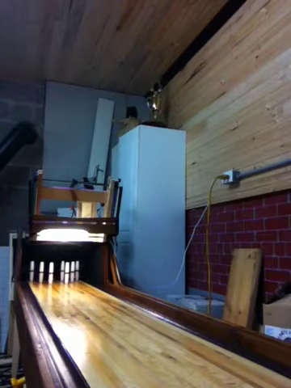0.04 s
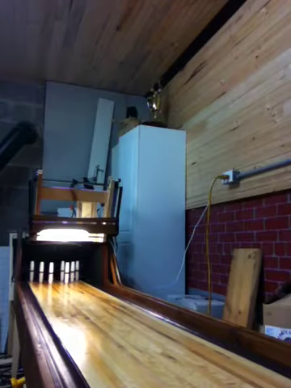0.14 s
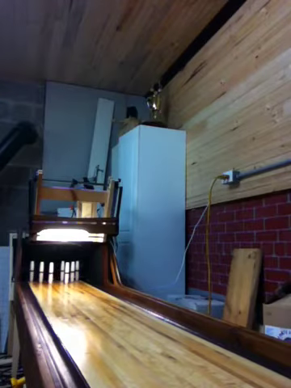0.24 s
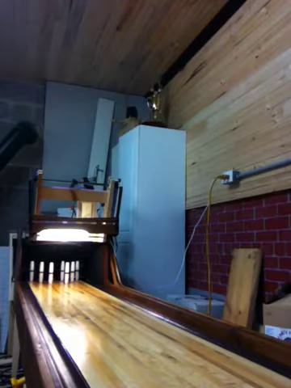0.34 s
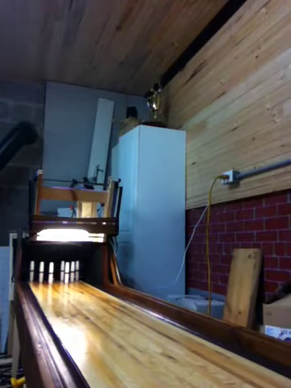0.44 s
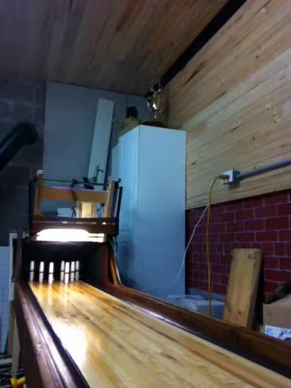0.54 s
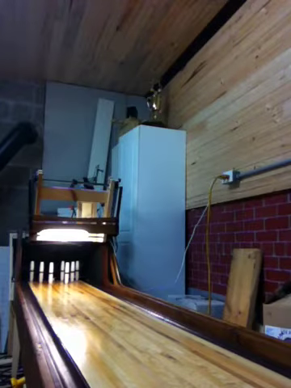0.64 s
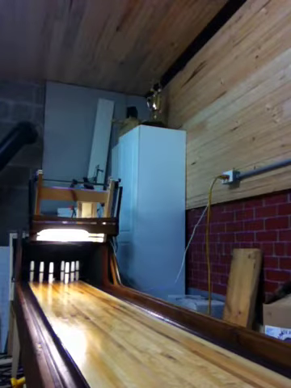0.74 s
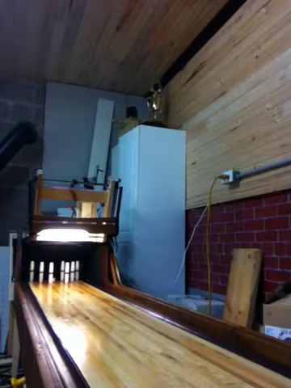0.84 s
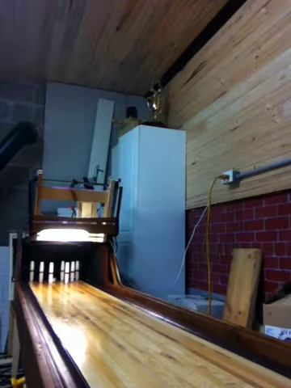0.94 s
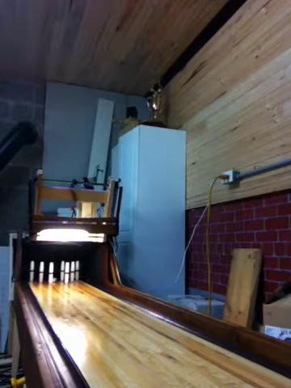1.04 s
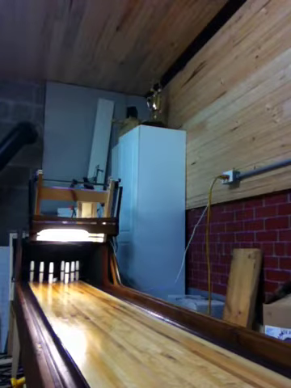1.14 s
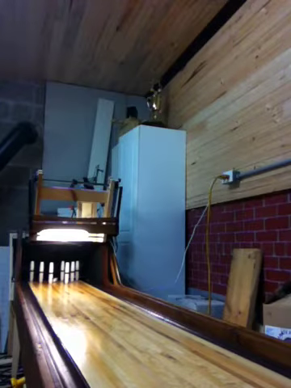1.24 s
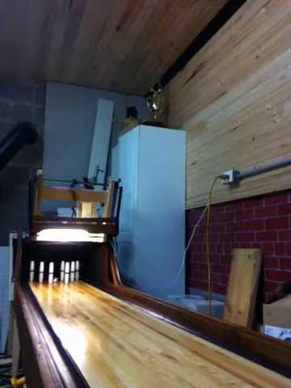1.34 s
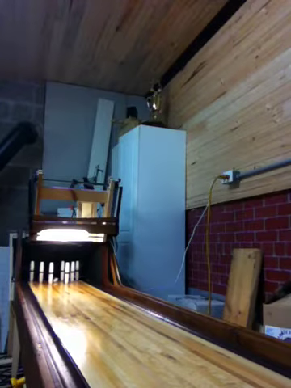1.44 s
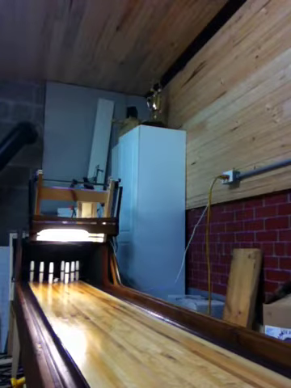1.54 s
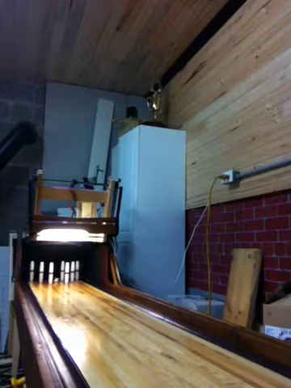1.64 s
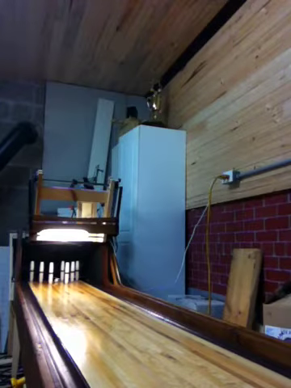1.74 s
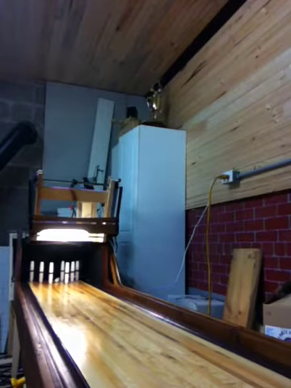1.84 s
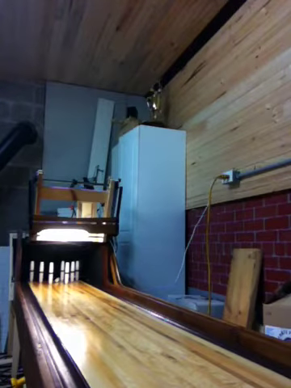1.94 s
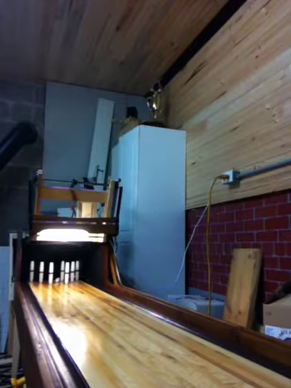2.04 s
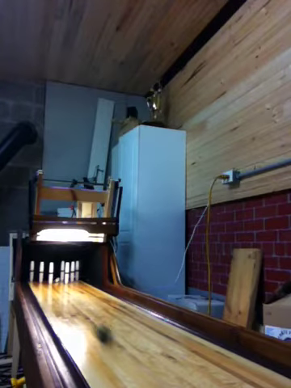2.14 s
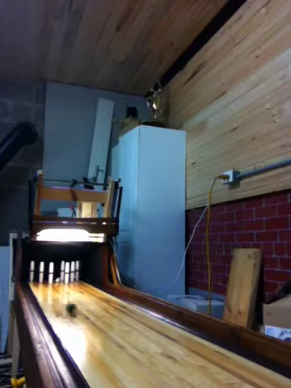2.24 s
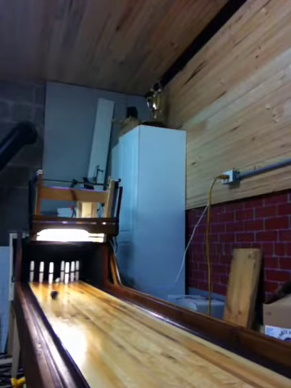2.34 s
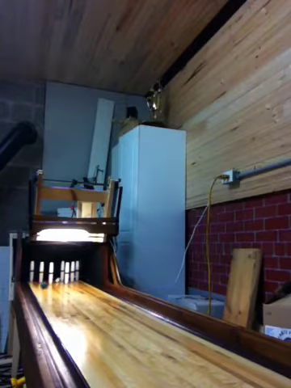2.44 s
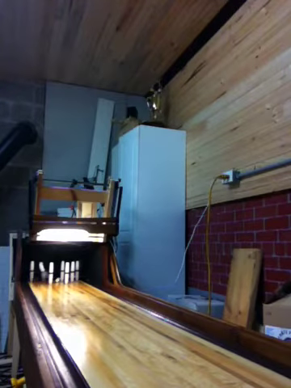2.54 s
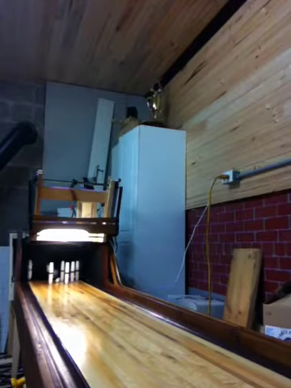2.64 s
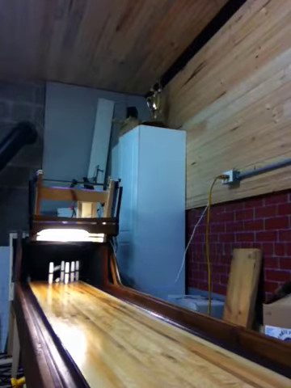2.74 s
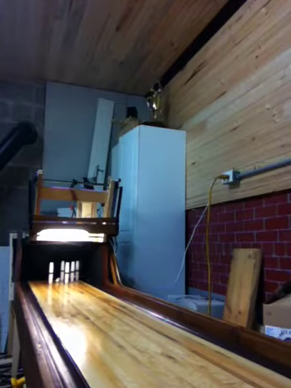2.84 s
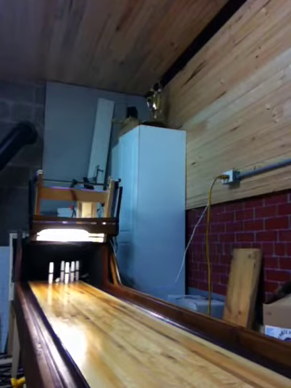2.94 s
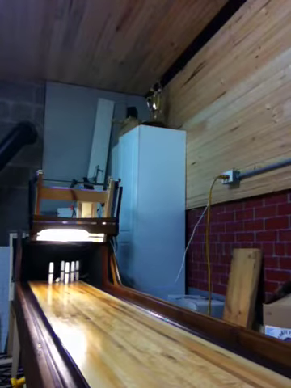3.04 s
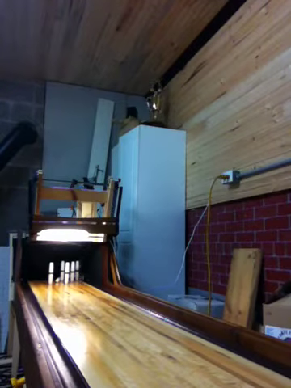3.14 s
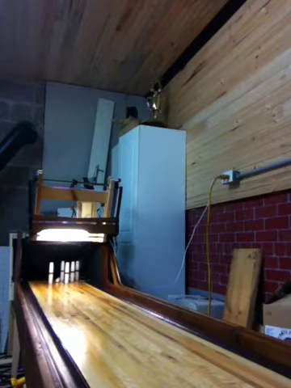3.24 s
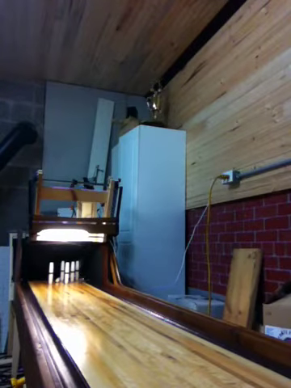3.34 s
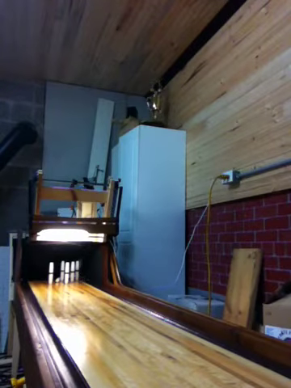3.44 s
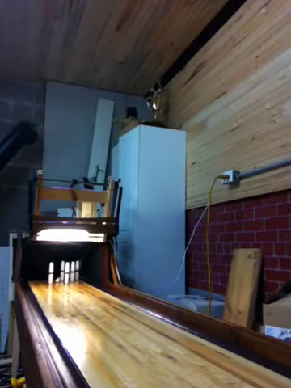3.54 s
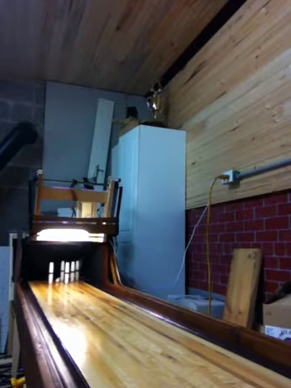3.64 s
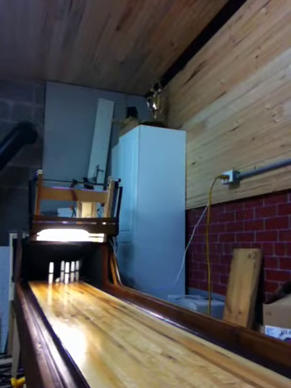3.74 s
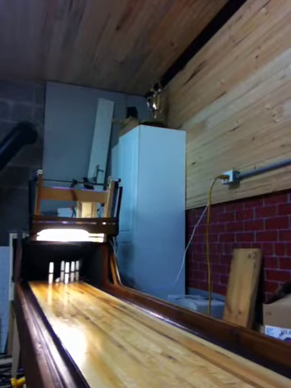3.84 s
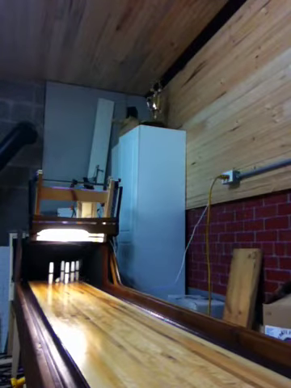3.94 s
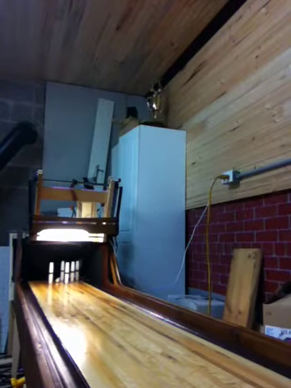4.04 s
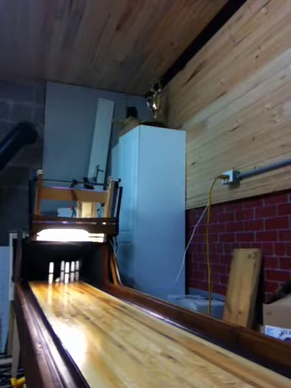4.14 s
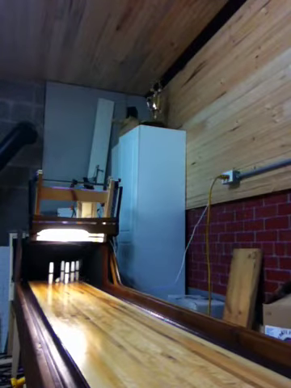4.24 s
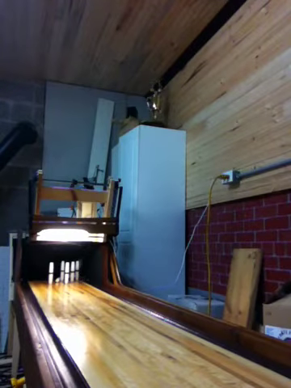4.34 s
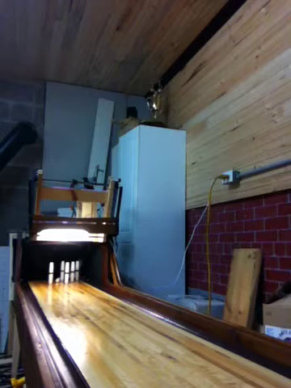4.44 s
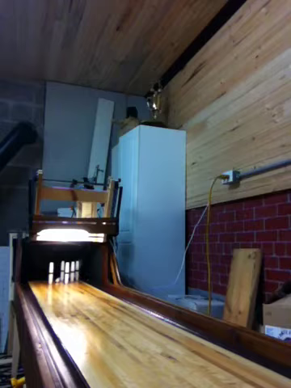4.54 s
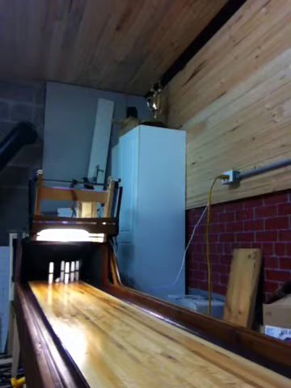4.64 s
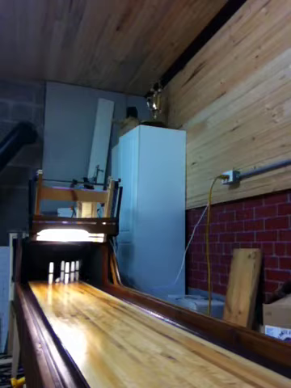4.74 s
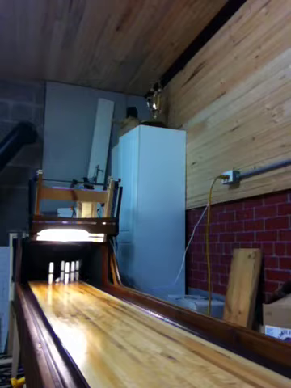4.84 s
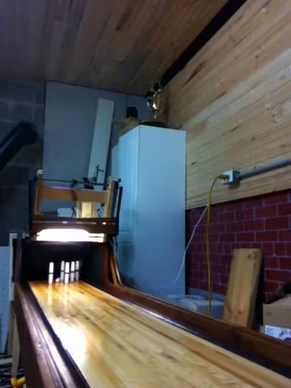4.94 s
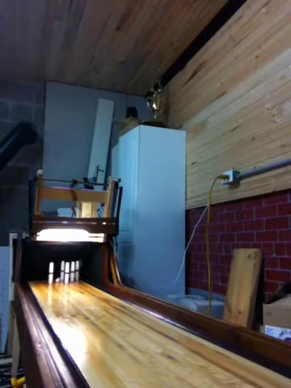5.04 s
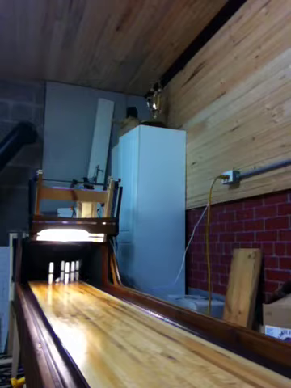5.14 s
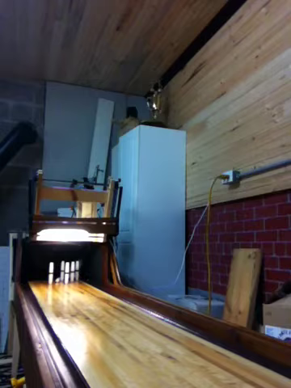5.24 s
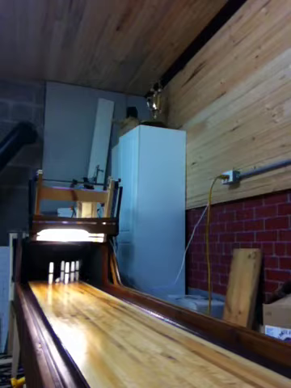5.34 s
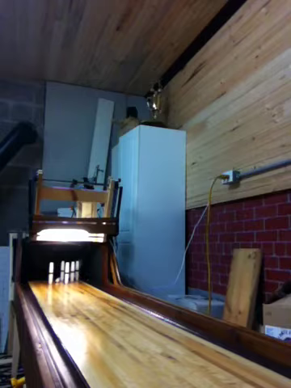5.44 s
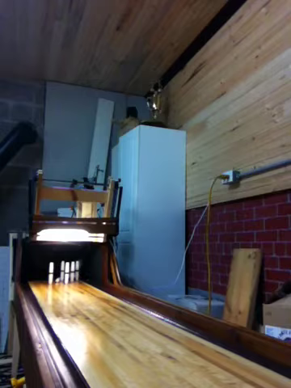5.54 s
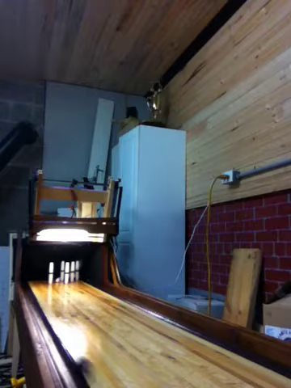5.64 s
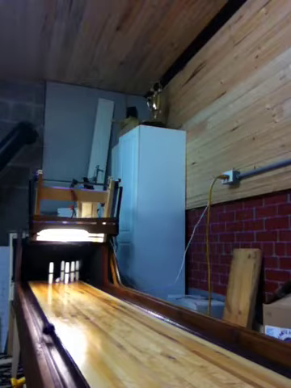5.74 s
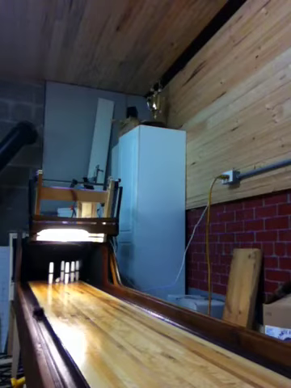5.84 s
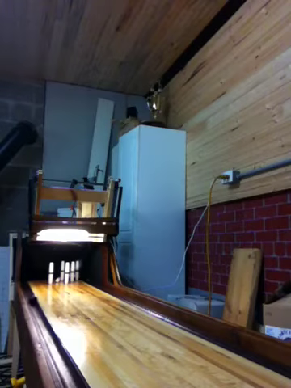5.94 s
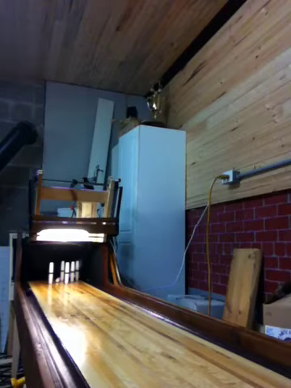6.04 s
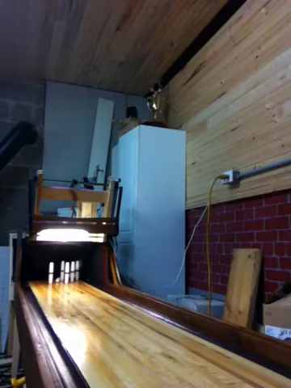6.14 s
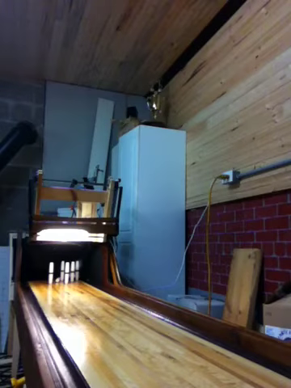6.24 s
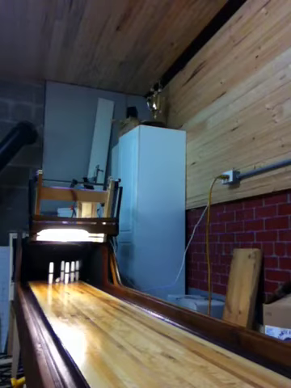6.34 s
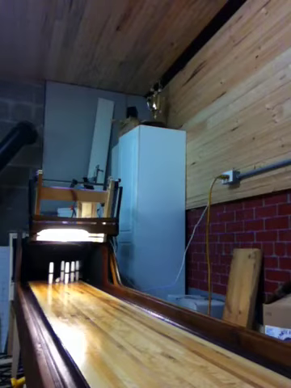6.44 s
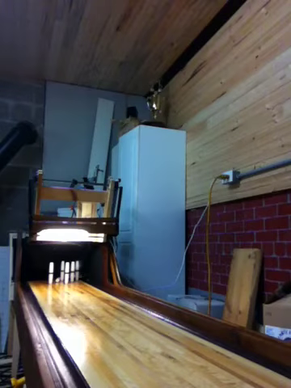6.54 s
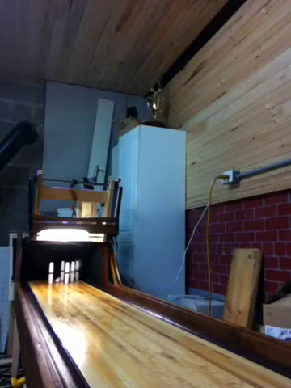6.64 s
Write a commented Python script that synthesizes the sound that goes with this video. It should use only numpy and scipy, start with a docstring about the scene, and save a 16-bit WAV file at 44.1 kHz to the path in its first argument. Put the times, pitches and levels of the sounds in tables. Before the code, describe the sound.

In a small indoor room with faint rumble and hiss, a wooden bowling machine clacks softly. A small ball drops on the boards, hops faster and softer, rolls, cracks into pins and tumbles with hollow knocks in the pit. After more clacks, a second ball bounces, rolls, knocks and scuffs along the gutter, then slams into the back. Mono, close to the lane, short room echo.

```python
"""The ball return of a home-built wooden lane clacks over a droning trough and steady room rumble and hiss.
A first small ball drops on the boards, hops ever lower and faster, rolls, scatters pins and tumbles in the pit.
The machine clacks again; a second ball drops, hops, rolls, scuffs along the gutter and slams into the back.
Hits are cracks, filtered noise shudders, decaying modes and room tails; rolling and drones are shaped noise."""
import sys
import numpy as np
from scipy import signal
from scipy.fft import rfft, irfft
from scipy.io import wavfile
from scipy.ndimage import uniform_filter1d

SR = 44100
rng = np.random.default_rng(int(sys.argv[2]) if len(sys.argv) > 2 else 0)


def store_pcm(level_fs):
    """Save levels as 16-bit WAV."""
    pcm = np.round(np.clip(level_fs, -1, 1) * 32767).astype(np.int16)
    wavfile.write(sys.argv[1], SR, np.atleast_2d(pcm).T)


N = 295029

# In the hit tables, thud and click are relative to the wood, ahead of the trims in blows().
# Balls dropped on the lane. Each row: start in seconds, first hop in seconds, bounciness 0-1,
# bounciness lost per second of hop.
THROWS = [(1.6935, .099, .885, 2.45), (5.2135, .1168, .84, 1.85)]
# First landing of each throw. Each row: wood in dB, crack pitch in Hz, thud in dB, click in dB.
LANDINGS = [(-11, 1088, -12, -14), (-11, 1110, -12, -11)]
# Change of a landing each time the hop halves
HALF_WOOD_DB, HALF_THUD_DB, HALF_CLICK_DB, HALF_OCTAVES = -6.5, 2, -3, -0.2
# Rolling ball jolting over uneven boards. Each row: start in seconds, wood in dB, crack pitch in Hz.
JOLTS = [(2.081, -23, 930), (2.1, -28.5, 860), (2.16, -31.5, 1050), (2.295, -28.5, 1010),
         (2.314, -27, 1350), (2.515, -22, 1340), (2.545, -24.5, 890), (2.569, -21.5, 832),
         (5.623, -20.5, 1480), (5.646, -24, 920), (5.674, -25, 1330), (5.708, -23.5, 960)]
JOLT_THUD_DB, JOLT_CLICK_DB = -15, -17.5
# Colour of the lane boards. Each row: frequency in Hz, relative level in dB per Hz.
LANE_COLOUR = [(35, -69), (74, -24), (99, -2), (123, -16.5), (166, -11), (295, -3), (332, -7), (539, 0.5),
               (619, -5.5), (1050, 1), (1420, -2), (2110, -11.5), (2980, -23), (6380, -39), (9500, -52),
               (12000, -67.5), (15000, -71)]
# Modes of the lane. Each row: frequency in Hz, relative level in dB, t60 in seconds.
LANE_MODES = [(101, -20.5, 0.44), (155.7, -16, 0.53), (189.7, -20, 0.19), (475, -14, 0.099),
              (1077, -17.5, 0.21)]

# Level curves of the runs, two on the lane and one in the gutter. Each row: time in seconds, level in dB
# ahead of the trims.
ROLL_RUNS = [
    [(2.03, -32.5), (2.474, -27), (2.568, -28), (2.61, -29.5)],
    [(5.54, -29), (5.608, -31.5), (5.65, -21), (5.76, -40.5)],
    [(5.99, -36), (6.006, -34), (6.346, -35), (6.39, -47)],
]
# Balance of each run. Each row: rumble in dB and hiss in dB, re the middle band, ahead of the trims.
ROLL_TINTS = [(-6, -17), (-15, -30), (-2, -8)]
# Colour of the rolling. Each row: frequency in Hz, relative level in dB per Hz.
ROLL_COLOUR = [(35, -67), (60, -45), (141, -11), (276, -10), (332, -12), (469, -10), (619, -3.5), (798, 5),
               (1300, -1.5), (1390, -3.5), (1600, -7.5), (2530, -13.5), (7500, -32.5), (15000, -60.5)]

# Ball clipping a pin. Each row: start in seconds, wood in dB, crack pitch in Hz, thud in dB, click in dB.
STRIKES = [(2.6195, -23.5, 3560, -25, 1), (2.6525, -26, 5970, -7, 1), (6.3955, -39.5, 5940, -14, 5)]
# Colour of a clipped pin. Each row: frequency in Hz, relative level in dB per Hz.
STRIKE_COLOUR = [(80, -45), (400, -16), (900, -5.5), (1600, 17.5), (2600, 6.5), (4000, 6.5), (6000, 2),
                 (7000, 0.5), (7700, -20.5), (10000, -14.5), (12000, -43), (16000, -42.5)]
# Pins tumbling on deck and side boards. Each row: start in seconds, wood in dB, crack pitch in Hz, click in dB.
PINS = [(2.835, -17.5, 2190, -7.5), (2.86, -19, 3060, -2.5), (2.867, -23, 3040, 2), (2.896, -35, 2490, -9),
        (2.946, -24.5, 2340, -8), (2.979, -21.5, 2550, -5.5), (2.994, -20.5, 2510, -18),
        (3.026, -22.5, 1980, -12.5), (3.354, -29, 2350, -15), (3.363, -35.5, 4010, -29)]
PIN_THUD_DB = -8
# Colour of tumbling pins. Each row: frequency in Hz, relative level in dB per Hz.
PIN_COLOUR = [(60, -31.5), (110, -18.5), (500, -2.5), (1000, -8.5), (1500, -3.5), (2300, -7), (3200, -0.5),
              (5600, 2), (7500, -7), (10000, -17.5), (12500, -32.5), (16000, -57)]
# Modes of the pins. Each row: frequency in Hz, relative level in dB, t60 in seconds.
PIN_MODES = [(584, -8.5, .25), (690, -8.5, .25), (944, -3, .26), (1405, -11, .35), (1850, -11, .45),
             (2306, -12, .35), (2923, -13.5, .28), (2992, -13.5, .3), (3218, -12.5, .3), (3774, -16.5, .35),
             (4010, -9.5, .11), (4134, -17, .35), (4806, -13, .3), (5228, -14.5, .35), (5912, -17.5, .35),
             (6670, -19.5, .4)]

# Ball against gutter and pit walls. Each row: start in seconds, wood in dB, crack pitch in Hz, click in dB,
# rebound in dB re the first hit.
KNOCKS = [(2.705, -29.5, 1030, -28, -10.5), (2.766, -20.5, 947, -13.5, 4.5), (2.842, -20, 920, -14, -12),
          (2.996, -20.5, 517, -21, -5.5), (3.079, -19.5, 1090, -32, -1), (3.197, -21, 840, -14, 3.5),
          (3.256, -24, 560, -18, -6), (3.285, -26, 363, -8, -2.5), (3.386, -31.5, 893, -14, 4),
          (3.501, -31.5, 695, -20, -3), (3.544, -29, 788, -17, -4.5), (5.775, -20.5, 775, -12.5, 0),
          (5.853, -24.5, 840, -15.5, 1), (5.912, -23, 815, -20.5, 4), (5.956, -27.5, 890, -17, -7),
          (6.156, -32.5, 800, -39, -8), (6.4535, -19, 377, -5.5, -6), (6.515, -25.5, 328, -12.5, -9),
          (6.547, -25, 317, -28, -12)]
KNOCK_THUD_DB, THUD_DB_PER_OCTAVE = -13.5, -2.5  # thud re wood for a crack at 1 kHz, and its slope
KNOCK_REBOUND_S = 0.0072
# Colour of gutter and pit walls. Each row: frequency in Hz, relative level in dB per Hz.
PIT_COLOUR = [(41, -55.5), (70, -26), (215, -6), (330, -2), (403, -4.5), (540, 1.5), (618, -9), (809, -4),
              (1160, -7), (1330, -9.5), (1480, -9.5), (2910, -16), (8000, -29.5), (10500, -40),
              (12500, -51.5), (15000, -62)]
# Modes of gutter and pit walls. Each row: frequency in Hz, relative level in dB, t60 in seconds.
PIT_MODES = [(290, -19.5, .35), (341, -18.5, 0.52), (458, -19, 0.28), (546, -21.5, 1), (751, -28.5, 0.2),
             (825, -13, 0.21), (1312, -16, 0.17)]

SCUFF_FROM_S, SCUFF_TO_S, SCUFF_DB, SCUFF_FLUTTER_DB = 5.79, 6.3, -50.5, 3.5
# Colour of the gutter scuff. Each row: frequency in Hz, relative level in dB per Hz.
SCUFF_COLOUR = [(1000, -29), (3500, 4.5), (7500, 0), (10500, -9), (13000, -21), (16000, -36)]

# Clacks of pinsetter and ball return. Each row: start in seconds, wood in dB, crack pitch in Hz, thud in dB,
# click in dB, rebound in dB re the first hit.
CLACKS = [(0.044, -29.5, 748, -15.5, -12, -0.5), (0.428, -35, 1326, -1, -13, -10.5),
          (0.643, -34, 1668, -6, -10.5, -16), (0.898, -53.5, 375, 15, -5, -11),
          (4.068, -48, 1224, -1, -30, -1), (4.152, -32.5, 1390, -5.5, -8, -6.5),
          (4.384, -37, 580, -6, -12, 5)]
CLACK_REBOUND_S = .01
# Colour of the machine. Each row: frequency in Hz, relative level in dB per Hz.
SETTER_COLOUR = [(50, -43), (90, -4), (140, 15.5), (300, 17.5), (560, 24), (950, 14.5), (1400, 17),
                 (2100, 6), (3000, -3.5), (5000, -16.5), (12000, -43)]
# Modes of the machine. Each row: frequency in Hz, relative level in dB, t60 in seconds.
SETTER_MODES = [(540, -6, 0.37), (970, 9.5, 0.4), (1325, -22, 0.41), (1709, -11, 0.31), (1770, -1, 0.24),
                (1825, -2, 0.18), (2780, -3, 0.13)]
# Each clack's thud also shakes the trough
KICK_DB, KICK_RISE_DB_PER_S, KICK_FALL_DB_PER_S, KICK_LAG_S = 0.5, 598, 170, 0.005

# Resonances of the hollow trough. Each row: frequency in Hz, half width in Hz, relative level in dB.
TROUGH = [(141, 16, -12.5), (350, 12, 6.5), (302, 51, -9.5), (417, 40, -6), (546, 10, -4.5),
          (700, 260, -8.5), (1368, 56, -32.5)]
# Resonances of the gutter. Each row: frequency in Hz, half width in Hz, relative level in dB.
GUTTER = [(750, 27.5, 2), (756, 18, 1), (802, 13, 5), (1400, 51, -7)]
# Resonances of the end boards. Each row: frequency in Hz, half width in Hz, relative level in dB.
END_BOARDS = [(330, 20, 14), (1296, 89, 12.5), (1660, 82, 6)]
# Trough swells. Each row: peak time in seconds, level in dB ahead of the trim, rise and fall in dB per second.
TROUGH_SWELLS = [(0.01, -32.5, 292, 45), (0.42, -43, 71, 28), (3.29, -23.5, 313, 38), (3.53, -29, 300, 139),
                 (4.17, -42, 50.5, 52), (6.334, -38, 72, 123), (6.458, -16.5, 402, 97)]
# Gutter swells. Each row: peak time in seconds, level in dB ahead of the trim, rise and fall in dB per second.
GUTTER_SWELLS = [(5.923, -21.5, 905, 157), (6.16, -29.5, 60, 92)]
# End board swells. Each row: peak time in seconds, level in dB ahead of the trim, rise and fall in dB per second.
END_SWELLS = [(6.34, -32, 111, 300), (6.5, -23.5, 300, 89)]

AIR_DB = -57
# Colour of the room air. Each row: frequency in Hz, relative level in dB per Hz.
AIR_COLOUR = [(20, -2.5), (50, 2.5), (80, 6.5), (110, 1), (160, 0.5), (240, -1.5), (350, -8.5), (600, -13),
              (1100, -17.5), (2500, -19), (6000, -20.5), (11000, -23), (16000, -32.5)]
# Decay of the room tail. One t60 in seconds each for thud, wood and click.
ROOM_T60_S = [0.34, 0.48, 0.49]
LOW_HZ, HIGH_HZ = 500, 2500  # band splits
CEILING, EDGE_HZ = .76, 16000


def bounces(count=8):
    """A dropped ball loses speed at each landing, so its hops get shorter, softer and duller."""
    rows = []
    for (s, first_hop_s, bounciness, loss), (wood_db, hz, thud_db, click_db) in zip(THROWS, LANDINGS):
        hop_s = first_hop_s
        for _ in range(count):
            halvings = np.log2(first_hop_s / hop_s)
            rows.append((s, wood_db + HALF_WOOD_DB * halvings, hz * 2 ** (HALF_OCTAVES * halvings),
                         thud_db + HALF_THUD_DB * halvings, click_db + HALF_CLICK_DB * halvings))
            s += hop_s
            hop_s *= bounciness - loss * hop_s
    return rows


def lane():
    """Landings and jolts of the balls excite the boards and their modes."""
    jolts = [(s, db, hz, JOLT_THUD_DB, JOLT_CLICK_DB) for s, db, hz in JOLTS]
    return blows(bounces() + jolts, LANE_COLOUR, LANE_MODES, crack_db=-8.0, cycles=1.8,
                 body_db=[-1, -4, 0], body_s=.0055, room_db=[-8, -9, -9],
                 modes_db=5.5, focus_db=9.5, echo_share=0.59)


def rolling(bumps_per_s=320, spread_db=3, smooth=0.28, lumpy_db=1.5, trim_db=(-3, -2, -3)):
    """The ball rides over the grain of the boards: many tiny bumps on an uneven rub."""
    out = np.zeros(N)
    struck = rng.random(N) < bumps_per_s / SR
    heights = gain_of(spread_db * np.minimum(rng.exponential(1, N), 3))
    bumps = struck * heights * rng.choice([-1., 1.], N)
    rub = smooth * rng.standard_normal(N)
    drive = (bumps + rub) * gain_of(lumpy_db * lumps(size=600))
    runs = [follow(*np.transpose(rows)) for rows in ROLL_RUNS]
    for band in range(3):
        level = sum(run * gain_of((rumble_db, 0, hiss_db)[band])
                    for run, (rumble_db, hiss_db) in zip(runs, ROLL_TINTS))
        texture = evened(signal.oaconvolve(drive, colour(ROLL_COLOUR, band))[:N])
        out += gain_of(trim_db[band]) * level * texture
    return out


def strikes():
    """The ball clips pins: a short, high crack and the pin modes."""
    return blows(STRIKES, STRIKE_COLOUR, PIN_MODES, crack_db=-13.5, cycles=1.5,
                 body_db=[-1, -1, -1], body_s=0.0041, room_db=[-14, -15, -15],
                 modes_db=1.5, focus_db=12.5, echo_share=0.76)


def pins():
    """Tumbling pins ring their modes against deck and side boards."""
    tumbles = [(s, db, hz, PIN_THUD_DB, click_db) for s, db, hz, click_db in PINS]
    return blows(tumbles, PIN_COLOUR, PIN_MODES, crack_db=-18, cycles=2.2,
                 body_db=[-1, -1, -1], body_s=0.0084, room_db=[-8, -8, -8],
                 modes_db=6.0, focus_db=8, echo_share=0.67)


def knocks():
    """Double knocks of the ball on hollow boards; the deeper the crack, the more thud."""
    rows = []
    for s, db, hz, click_db, rebound_db in KNOCKS:
        thud_db = KNOCK_THUD_DB + THUD_DB_PER_OCTAVE * np.log2(hz / 1000)
        rows.append((s, db, hz, thud_db, click_db, rebound_db))
    return rebounding(rows, KNOCK_REBOUND_S)


def pit():
    """Knocks excite the hollow gutter and pit walls and their modes."""
    return blows(knocks(), PIT_COLOUR, PIT_MODES, crack_db=-5.5, cycles=2.04,
                 body_db=[-1, -3, 0], body_s=0.01, room_db=[-8, -9, -9],
                 modes_db=1.0, focus_db=8.0, echo_share=0.81)


def scuff():
    """Bright fluttering hiss of the ball rubbing the side of the gutter."""
    rub = evened(signal.oaconvolve(rng.standard_normal(N), colour(SCUFF_COLOUR))[:N])
    flutter = gain_of(SCUFF_FLUTTER_DB * lumps(size=400))
    return rub * flutter * follow([SCUFF_FROM_S, SCUFF_TO_S], [SCUFF_DB, SCUFF_DB])


def setter():
    """Double clacks of pinsetter and ball return: longer cracks and strongly focused modes."""
    return blows(rebounding(CLACKS, CLACK_REBOUND_S), SETTER_COLOUR, SETTER_MODES, crack_db=-8.5, cycles=11.0,
                 body_db=[-1, -1, 0], body_s=0.016, room_db=[-7, -7, -7],
                 modes_db=11.0, focus_db=29.5, echo_share=0.83)


def channels():
    """Trough, gutter and end boards hum on their resonances; clack thuds also shake the trough."""
    kicks = [(s + KICK_LAG_S, db + thud_db + KICK_DB, KICK_RISE_DB_PER_S, KICK_FALL_DB_PER_S)
             for s, db, _, thud_db, _, _ in CLACKS]
    trough = drone(TROUGH, TROUGH_SWELLS + kicks, trim_db=-4.0)
    gutter = drone(GUTTER, GUTTER_SWELLS, trim_db=-1)
    end_boards = drone(END_BOARDS, END_SWELLS, trim_db=-2.5)
    return trough + gutter + end_boards


def air():
    """Low steady rumble and hiss of the room, from coloured noise."""
    return gain_of(AIR_DB) * evened(signal.oaconvolve(rng.standard_normal(N), colour(AIR_COLOUR))[:N])


def blows(rows, spectrum, modes, crack_db, cycles, body_db, body_s, room_db, modes_db, focus_db, echo_share):
    """Each blow: a crack of a few cycles, a short shudder of the wood, its modes, and the room's tail.
    echo_share of the tail is the shudder thrown back, with its own uneven colour; the rest is a plain wash."""
    out, t = np.zeros(N), np.arange(SR * 3 // 4) / SR
    early = t < .03
    filters = [colour(spectrum, band) for band in range(3)]
    share = np.clip(echo_share, 0, 1)
    for s, wood_db, hz, thud_db, click_db in rows:
        u = 1.88 * t * hz / cycles
        # gradient: a small surface radiates no bass
        crack = np.gradient(u ** 2 * np.exp(-u) * np.sin(2 * np.pi * hz * t))
        sound = gain_of(crack_db) * crack / crack[early].std()
        levels_db = (thud_db, 0, click_db)
        for taps, level_db, trim_db, tail_db, t60 in zip(filters, levels_db, body_db, room_db, ROOM_T60_S):
            grain, walls, wash = rng.choice([-1., 1.], (3, len(t)))
            shudder = grain * np.exp(-t / body_s)
            fade = gain_of(tail_db - 60 * t / t60)
            kernel = shudder[early] / np.linalg.norm(shudder)
            echo = signal.fftconvolve(walls * fade, kernel)[:len(t)]
            tail = np.sqrt(share) * echo + np.sqrt(1 - share) * wash * fade
            part = signal.fftconvolve(shudder + tail, taps)[:len(t)]
            sound += gain_of(level_db + trim_db) * part / part[early].std()
        for (mode_hz, mode_db, t60), (a, b) in zip(modes, rng.standard_normal((len(modes), 2))):
            # modes near the crack pitch are favoured; each blow lands on another spot
            octaves_off = abs(np.log2(mode_hz / hz))
            ring_db = modes_db + mode_db + a - focus_db * min(2 * octaves_off, 1)
            swell = 1 - np.exp(-t * mode_hz / 2)
            tone = np.sin(2 * np.pi * mode_hz * (1 + 0.0035 * b) * t)
            sound += gain_of(ring_db - 60 * t / t60) * swell * tone
        add(out, s, gain_of(wood_db) * sound)
    return out


def rebounding(rows, gap_s):
    """Each hit is followed at once by a second one of the same colour."""
    hits = []
    for s, db, hz, thud_db, click_db, rebound_db in rows:
        hits.append((s, db, hz, thud_db, click_db))
        hits.append((s + gap_s, db + rebound_db, hz, thud_db, click_db))
    return hits


def drone(resonances, swells, trim_db):
    """A rolling ball or a shake keeps a hollow body sounding: noise through its resonances, levelled."""
    hz = np.fft.rfftfreq(N, 1 / SR)
    body = sum(gain_of(db) / (1 + ((hz - f) / width) ** 2) for f, width, db in resonances)
    hum = evened(irfft(body * rfft(rng.standard_normal(N)), N))
    hum /= np.sqrt(uniform_filter1d(hum ** 2, size=3000) + .01)  # a running level evens out the hum
    return gain_of(trim_db) * hum * swelling(swells)


def swelling(swells):
    """Gain of overlapping swells that each rise and fall at a steady dB rate, summed in power."""
    t = np.arange(N) / SR
    power = 0
    for s, db, rise, fall in swells:
        drop_db = np.maximum((s - t) * rise, (t - s) * fall).clip(max=200)
        power = power + gain_of(db - drop_db) ** 2
    return np.sqrt(power)


def follow(times, db):
    """Gain over the whole scene along a level curve, faded to silence outside it."""
    t = np.arange(N) / SR
    gate = np.interp(t, [times[0] - .02, times[0], times[-1], times[-1] + 0.19], [0, 1, 1, 0])
    return gain_of(np.interp(t, times, db)) * gate


def lumps(size):
    """Slow random unevenness of rms 1, with features about size samples long."""
    return evened(uniform_filter1d(uniform_filter1d(rng.standard_normal(N), size), size))


def colour(points, band=None, size=4096):
    """Causal minimum-phase filter with the given spectrum; band 0, 1 or 2 keeps its bass, middle or treble."""
    hz = abs(np.fft.fftfreq(size, 1 / SR)) + 1
    f, db = np.transpose(points)
    gain = gain_of(np.interp(np.log(hz), np.log(f), db))
    if band is not None:
        low = 1 / (1 + (hz / LOW_HZ) ** 8)
        high = 1 / (1 + (HIGH_HZ / hz) ** 8)
        gain = gain * np.sqrt([low, (1 - low) * (1 - high), high][band])
    log_gain = np.log(np.maximum(gain / gain.max(), 1e-5))
    return np.fft.ifft(np.exp(np.conj(signal.hilbert(log_gain)))).real[:size // 2]


def gain_of(db):
    """Decibels to amplitude."""
    return 10 ** (np.asarray(db) / 20)


def evened(x):
    """Scales to rms 1."""
    return x / np.sqrt(np.mean(x ** 2) + 1e-20)


def add(mix, s, sound):
    """Mixes a sound in at time s."""
    part = mix[max(round(s * SR), 0):][:len(sound)]
    part += sound[:len(part)]


def scene():
    """Sum of balls, pins, pit, machine, hollow channels and room air, on one channel."""
    balls = lane() + rolling() + scuff()
    hits = strikes() + pins() + pit()
    background = setter() + channels() + air()
    return (balls + hits + background)[None]


def record(dry, leak_db=-10):
    """The loudest peaks are rounded off, little deep bass gets through; then the band limit."""
    held = dry / (1 + (dry / CEILING) ** 6) ** (1 / 6)
    hz = np.fft.rfftfreq(2 * N, 1 / SR)
    deep = 1 / (1 + (hz / 93) ** 22)
    bass_cut = 1 - deep * (1 - min(gain_of(leak_db), 1))
    held = irfft(rfft(held, 2 * N) * bass_cut)[:, :N]
    band_limit = signal.firwin(511, EDGE_HZ, window=("kaiser", 9), fs=SR)
    return signal.oaconvolve(held, band_limit[None], "same")


dry = scene()
out = record(dry)
store_pcm(out)
```